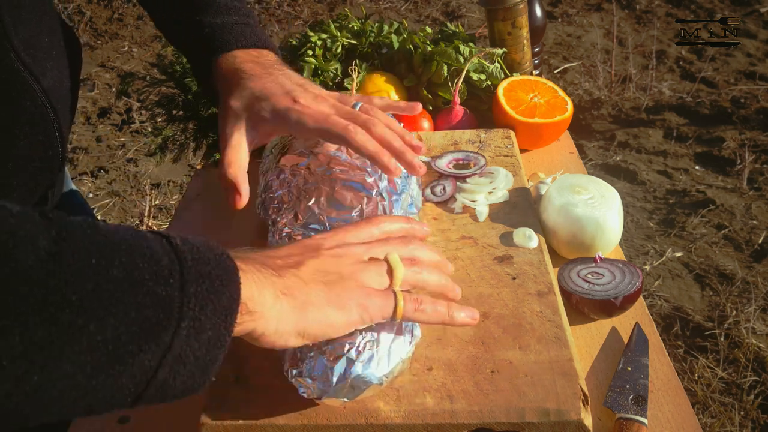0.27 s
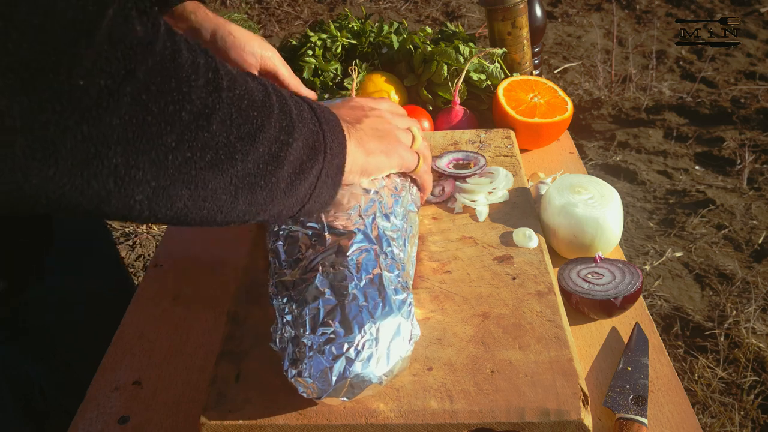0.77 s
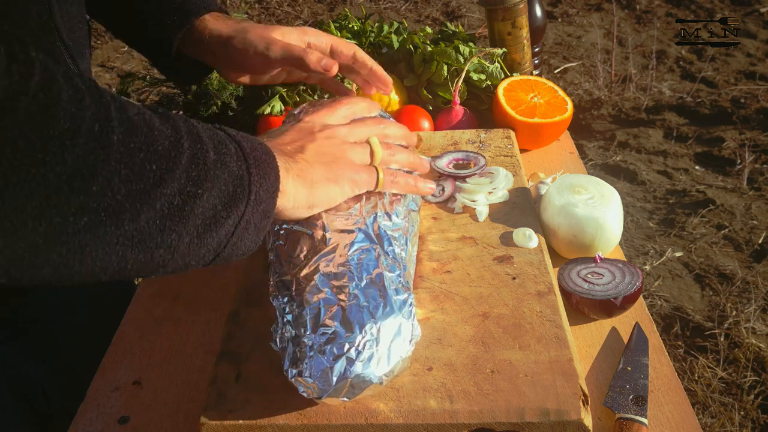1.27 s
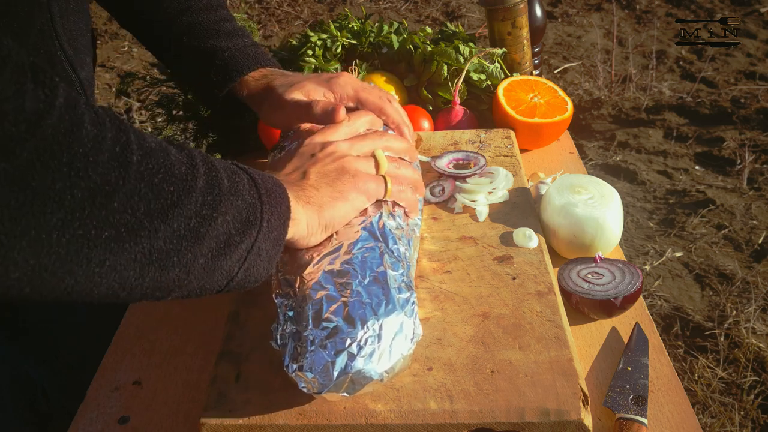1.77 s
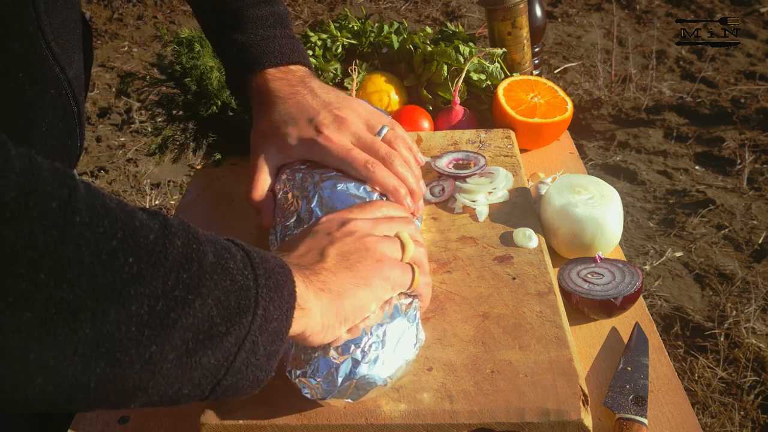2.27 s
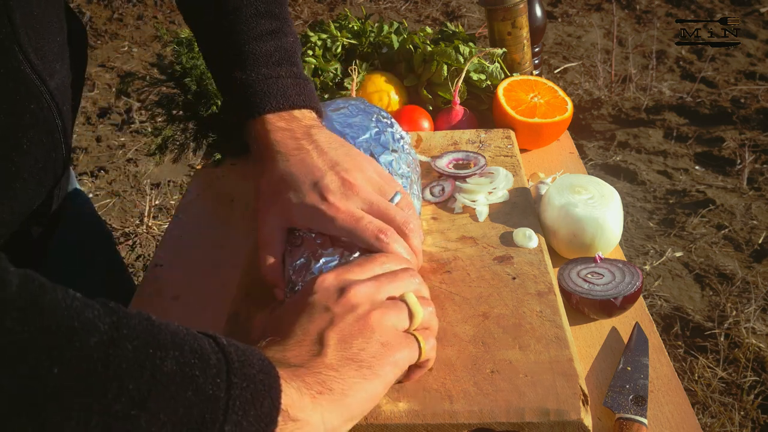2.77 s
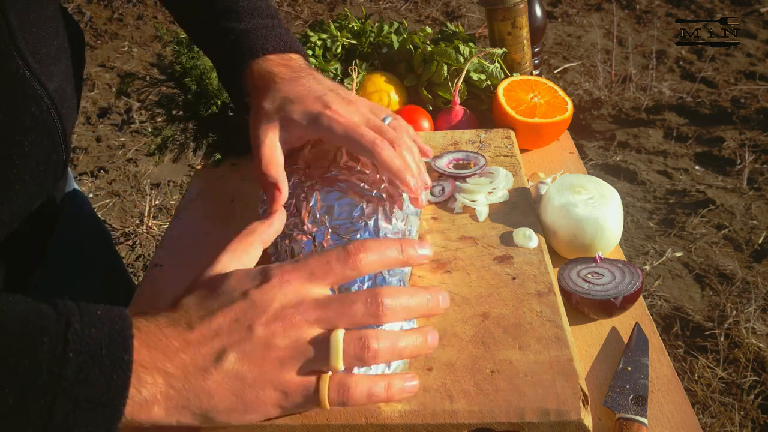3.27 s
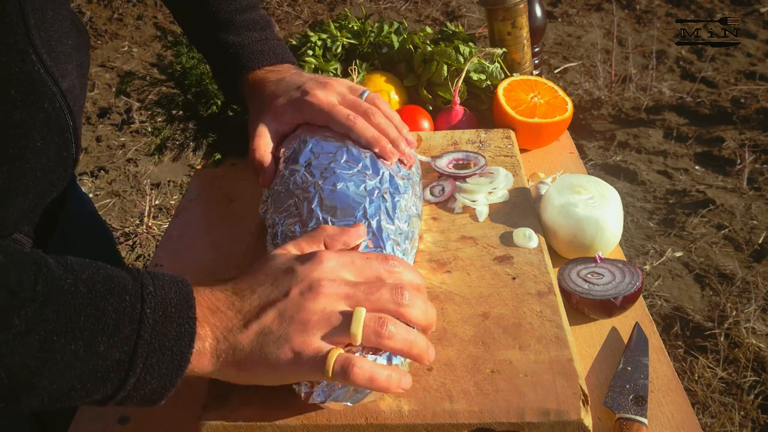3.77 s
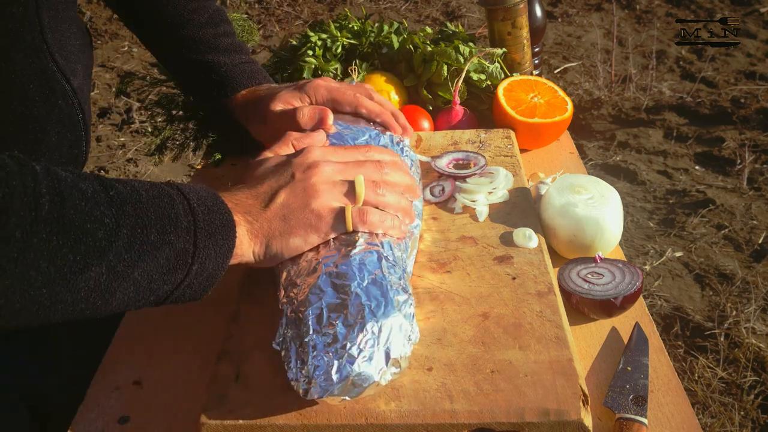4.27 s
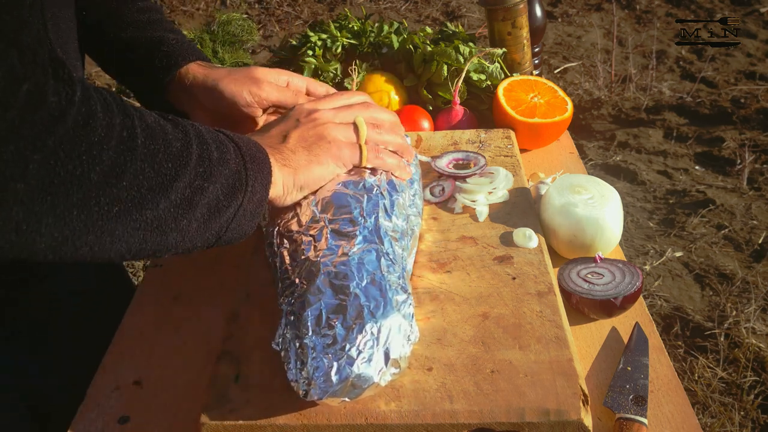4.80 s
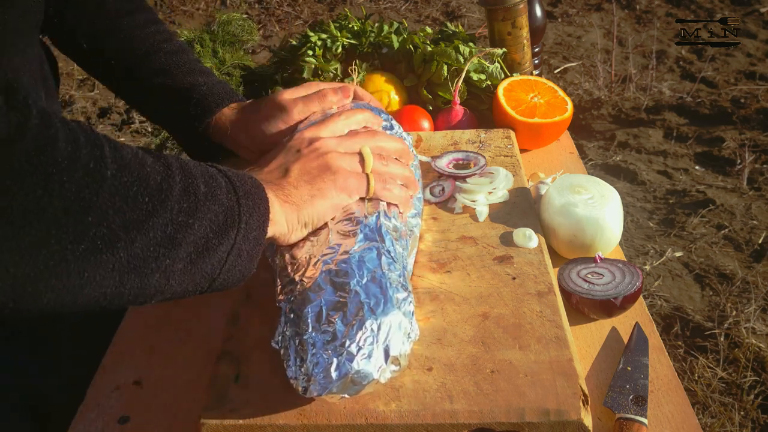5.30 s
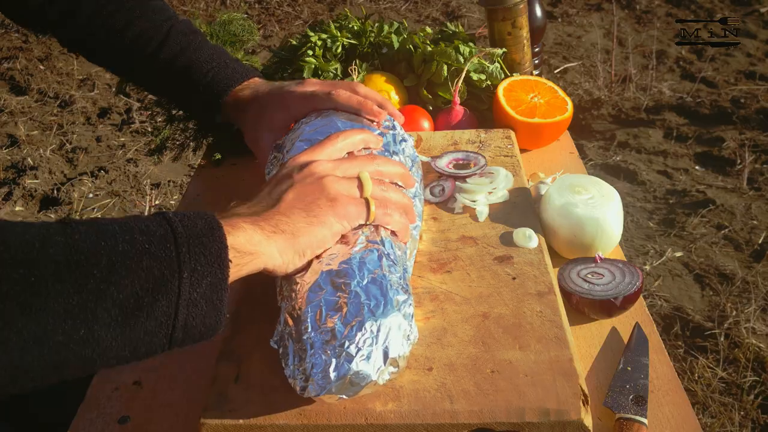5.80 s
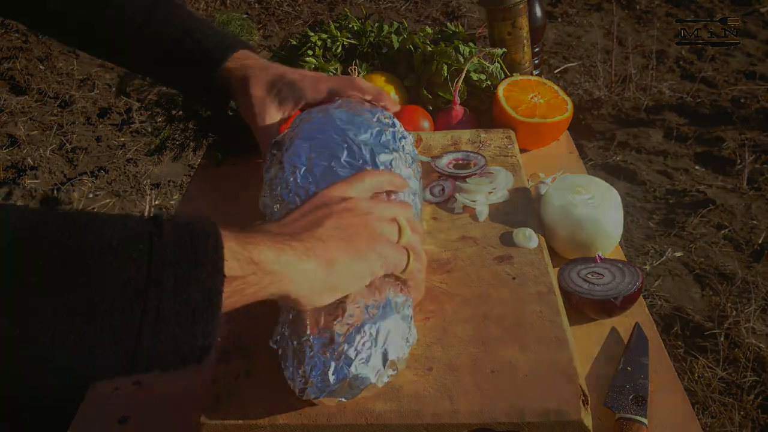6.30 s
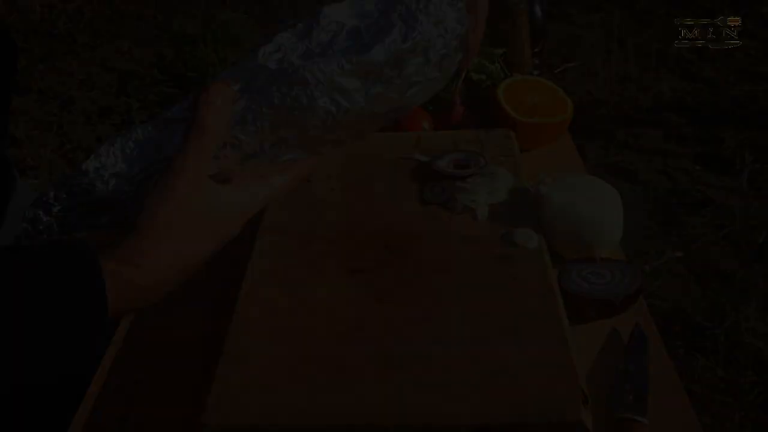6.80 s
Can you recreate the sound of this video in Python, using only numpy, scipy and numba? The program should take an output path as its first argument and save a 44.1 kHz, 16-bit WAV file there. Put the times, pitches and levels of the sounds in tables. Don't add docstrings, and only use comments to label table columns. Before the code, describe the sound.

Outdoors, a small stereo microphone sits close to hands pressing aluminium foil round a parcel. A sharp crunch opens at 0 s, followed by a lighter press and sparse ticks until about 0.6 s. Dense crackling with hard snaps fills 0.65 to 1.05 s, then another strong squeeze runs from 1.35 to 1.7 s. More crumpling comes at 2.1 to 2.35 s, and a heavy burst from 2.65 to 3.0 s holds the loudest snap near 2.93 s. Shorter squeezes follow around 3.5, 4.1, 4.7, 5.2 and 5.9 s, separated by quiet gaps with dry single ticks as the sheet springs back. Low wind rumble comes and goes beneath, its strongest gust near 5.2 s, over very faint hiss. From 6.45 s the last crackles fade, reaching silence by about 6.94 s.

```python
import sys
import numpy as np
from scipy import signal
from scipy.fft import rfft, irfft
from scipy.io import wavfile
from scipy.ndimage import uniform_filter1d
from numba import njit

SR = 44100
rng = np.random.default_rng(int(sys.argv[2]) if len(sys.argv) > 2 else 0)


def volts(x):
    e = np.asarray(x, float) / 20
    return 10 ** e


def store_pcm(level_fs):
    pcm = np.round(np.clip(level_fs, -1, 1) * 32767).astype(np.int16)
    wavfile.write(sys.argv[1], SR, np.atleast_2d(pcm).T)


N = 310905
TIME = np.arange(N) / SR
FADE_FROM_S, FADE_TO_S = 6.45, 6.937
FADE = np.interp(TIME, [FADE_FROM_S, FADE_TO_S], [1, 0])
TREBLE_DB = -4.0

# frequency in Hz, gain in dB.
LEFT_PORT = [(400, -17), (600, -27), (850, -5.5), (1400, -3), (2200, -3), (2900, 2.44), (4000, -3.5),
             (5500, -1), (7800, 1), (8600, -1.5), (9600, -17.5), (11400, -25.5), (12200, -19.5),
             (15700, -20)]
# frequency in Hz, gain in dB.
RIGHT_PORT = [(400, -9), (600, -20), (850, -13), (1400, -7), (2200, 4), (2900, -0.66), (4000, -1.5),
              (5500, -3.5), (7800, -13), (8600, -16.5), (9600, -27), (11400, -30.5), (12200, -27),
              (15700, -26)]


def pressure(s):
    # grip in seconds, letting go in seconds,
    # crackle level at the grip in dB, level at letting go in dB.
    squeezes = [(0.0, 0.043, -41.5, -43.5), (0.2, 0.365, -48.5, -60), (0.644, 0.792, -53.5, -47),
                (0.826, 1.002, -42, -43), (1.01, 1.053, -58, -55), (1.124, 1.185, -54.5, -47),
                (1.342, 1.442, -49, -46), (1.432, 1.698, -41.5, -46), (1.865, 1.98, -51.5, -62),
                (2.083, 2.351, -44.5, -41.5), (2.499, 2.626, -47.5, -63), (2.64, 2.873, -50, -44),
                (2.845, 3.002, -44.5, -48.5), (3.165, 3.223, -54.5, -45), (3.398, 3.483, -61, -51),
                (3.487, 3.686, -42.5, -49), (3.819, 3.916, -47.5, -52.5), (4.019, 4.219, -43.5, -45),
                (4.318, 4.431, -64, -50), (4.59, 4.771, -49, -46.5), (4.908, 4.995, -54, -49.5),
                (5.048, 5.293, -44.5, -47.5), (5.428, 5.503, -57.5, -48), (5.593, 5.626, -47, -48.5),
                (5.654, 5.854, -54, -45), (5.87, 5.961, -46, -51), (6.048, 6.236, -54, -58),
                (6.27, 6.372, -55, -52), (6.421, 6.636, -53.5, -44), (6.745, 6.8, -70, -69.5)]
    grip_db_per_s, release_db_per_s = 520, 611
    touch_db, touch_db_per_s = -11, 110
    settle_db, settle_db_per_s, rest_db = -17, 102, -71.5
    grip, free, grip_db, free_db = np.transpose(squeezes)[:, :, None]
    held_db = grip_db + (free_db - grip_db) * np.clip((s - grip) / (free - grip), 0, 1)
    fade_db = 20 * np.log10(np.interp(s, TIME, FADE) + 0.01)
    before = np.maximum(grip - s, 0)
    rise_db = np.minimum(grip_db_per_s * before, touch_db_per_s * before - touch_db)
    after = np.maximum(s - free, 0)
    fall_db = np.minimum(release_db_per_s * after, settle_db_per_s * after - settle_db - fade_db)
    db = held_db - rise_db - fall_db
    return np.maximum(db.max(axis=0), rest_db + fade_db)


def crackle(count=8500, burst_db=2.5, loose_db=3.0, tight_db=2.0, trim_db=2.13):
    treble_wander_db, loose_dull_db = 1.18, -1.5
    loose_share = 0.4
    when, odds, pick = rng.random((count, 3)).T
    when = (np.arange(count) + 2 * when) * N / SR / (count + 1)
    at = (when * SR).astype(int)
    db = pressure(when)
    treble_db = TREBLE_DB + treble_wander_db * walk(12)[at]
    treble_db = treble_db + np.interp(db, [-72, -58], [loose_dull_db, 0])
    bursts_db = burst_db * (walk(160) + 0.75 * walk(35))[at]
    scatter_db = np.interp(db, [-65, -45], [loose_db, tight_db])
    size_db = -scatter_db * (-0.5 + np.log(odds + 0.022))
    energy = volts(db + trim_db + bursts_db + size_db) ** 2 * N / count
    share = np.interp(db, [-68, -48], [loose_share, 1])
    energy = energy * (pick < share) / share
    hz, energy = flurry(when, energy, 0.72 * (treble_db + 4.0), count=7)
    return facets(when[:, None], energy, hz, spread_ms=1.6, cycles=1.09, length_spread=0.66)


def snaps(table, flurry_db=14.5, ring_db=1.5, ring_cycles=0.49):
    s, db, pitch_hz, treble_db = np.transpose(table)
    hz, energy = flurry(s, volts(db + flurry_db) ** 2, 0.55 * (treble_db + 4), count=24)
    broad = facets(s[:, None] - 0.001, energy, hz, spread_ms=1.05, cycles=0.57, length_spread=0.32)
    peak = volts(db + ring_db) / np.sqrt(gain(LEFT_PORT, pitch_hz) * gain(RIGHT_PORT, pitch_hz))
    energy = peak ** 2 * ring_cycles * SR / np.minimum(pitch_hz, 3000)
    ring = facets(s - 0.0006, energy, pitch_hz, spread_ms=0.03, cycles=ring_cycles, length_spread=0.054)
    return broad + ring


def creases(over_db=10.5, scatter_db=2.0, treble_spread_db=8.0, count=170):
    when, odds, place, tone = rng.random((count, 4)).T
    s = (np.arange(count) + when) * FADE_TO_S / count
    db = pressure(s) + over_db - scatter_db * np.log(odds + 0.05)
    treble_db = TREBLE_DB + treble_spread_db * 2 * (tone - 0.5)
    return np.transpose([s, db, 1800 * 4.5 ** place, treble_db])


def crumpled_foil():
    # peak time in seconds, peak level in dB,
    # pitch of the largest facet in Hz, treble share in dB.
    clear_creases = [(0.002, -25, 3440, -6), (0.0684, -28, 3300, 4), (0.2078, -38, 6350, -24),
                     (0.6727, -32.5, 2300, -5), (0.8613, -28, 2340, -9), (0.8905, -26, 2840, -14),
                     (0.9326, -29.5, 8400, -10), (0.9581, -24, 2270, -11), (1.0015, -25.5, 2580, -4),
                     (1.3724, -33.5, 7100, 4), (1.5812, -27.5, 2560, -18), (1.6822, -30.5, 1380, -10),
                     (2.1785, -27, 2560, -13), (2.2162, -28.5, 1930, -7), (2.2451, -29, 3000, 7),
                     (2.3576, -32, 3000, -7), (2.8248, -22, 2600, -5), (2.8632, -25.5, 2170, -6),
                     (2.9303, -17, 2110, -18.5), (3.1765, -36.5, 1820, -23), (3.5766, -26.5, 2300, 4),
                     (3.6465, -30, 2410, -5), (4.0316, -33, 2640, -7), (4.1793, -32.5, 3140, -8),
                     (4.2224, -33, 3120, 2), (4.7612, -26, 7200, 6), (5.2052, -33.5, 2360, 1),
                     (5.3049, -27.5, 3030, 7), (5.8774, -24.5, 2790, -3), (6.4905, -35, 1590, -8)]
    # time in seconds, peak level in dB,
    # pitch in Hz, treble share in dB.
    lone_ticks = [(0.0851, -44, 4480, -1), (0.3505, -38.5, 2800, -12), (0.359, -39, 2890, -11),
                  (0.4597, -48.5, 5810, -7), (0.4996, -53, 2580, -4.6), (0.5405, -53.2, 7900, -1.5),
                  (1.0809, -41, 5080, 2), (1.1292, -32.5, 8200, 7.5), (1.2668, -37.5, 2520, -2),
                  (1.3127, -44, 7490, -1), (1.7538, -36, 3060, -1), (1.8777, -37, 7660, 15),
                  (1.963, -34.5, 5000, 2), (2.436, -43, 5770, 4), (3.0284, -42.5, 6500, -9),
                  (3.159, -38.5, 4310, -14), (3.343, -50, 1730, -14), (3.371, -53, 5300, 18),
                  (3.7284, -37.5, 5370, 2), (3.748, -45, 4390, 0), (3.7722, -41, 4390, -3),
                  (4.2636, -41.5, 5640, -3), (4.33, -41.5, 4800, 9), (4.455, -35.5, 6600, -2),
                  (4.8122, -33.5, 3080, -1), (5.3459, -34, 8000, 3), (5.5003, -35, 7400, -1.9),
                  (5.9752, -37, 2930, 2), (6.4174, -42.5, 5560, -5), (6.871, -60.5, 4500, 2)]
    foil = crackle() + snaps(np.vstack([clear_creases, creases()]))
    foil = foil + snaps(lone_ticks, flurry_db=15.5, ring_db=0.1, ring_cycles=0.56)
    return np.array([colour(foil[0], LEFT_PORT), colour(foil[1], RIGHT_PORT)])


def flurry(s, energy, tilt_db, count, patchy_db=2.0):
    low, high = np.sqrt(500), np.sqrt(16500)
    place, patch = np.moveaxis(rng.random((len(s), count, 2)), -1, 0)
    hz = (low + (high - low) * (np.arange(count) + place) / count) ** 2
    tilt = volts(tilt_db[:, None] * np.log2(np.clip(hz, 2100, 8000) / 3500))
    patchiness = volts(2 * patchy_db * (patch - 0.5))
    share = np.sqrt(hz / 4000) * (tilt * patchiness) ** 2
    return hz, energy[:, None] * share / share.sum(axis=1, keepdims=True)


def facets(s, energy, hz, spread_ms, cycles, length_spread, alike_hz=2300, scatter=1.8, lead_us=60, pan_db=4.5):
    wait, length, turn, slip, pan = np.moveaxis(rng.standard_normal(hz.shape + (5,)), -1, 0)
    start = (SR * (s + spread_ms / 1000 * wait ** 2)).astype(np.int64).ravel()
    tau = cycles * (hz / 2000) ** 0.18 * np.exp(length_spread * length) * SR / hz
    tau = np.clip(tau, 2, 70)
    size = np.sqrt(8 * energy / tau)
    unlike = 1 / (1 + (alike_hz / hz) ** 6)
    apart = unlike * (2 * np.pi * hz * lead_us / 960000.0 + scatter * slip)
    ports = []
    for side in (0.5, -0.5):
        loud = size * volts(side * pan_db * pan * (0.6752 + unlike))
        phase = 10 * turn + side * apart
        ports.append(rings(start, hz.ravel(), tau.ravel(), loud.ravel(), phase.ravel()))
    return np.array(ports)


@njit
def rings(start, hz, tau, size, phase):
    out = np.zeros(N)
    for g in range(len(start)):
        step = np.exp(2j * np.pi * hz[g] / SR - 1 / tau[g])
        z = size[g] / tau[g] * np.exp(1j * phase[g])
        for i in range(int(7 * tau[g]) + 2):
            if 0 <= start[g] + i < N:
                out[start[g] + i] += i * z.imag
            z *= step
    return out


def wind(apart_db=-18.5):
    # frequency in Hz, level in dB per Hz.
    rumble = [(15, -9), (30, -0.5), (64, -1), (130, -7), (220, -14.5), (400, -32), (700, -40),
              (1200, -57.5)]
    # peak time in seconds, rumble level in dB.
    gusts = [(0.05, -52), (0.79, -55.5), (0.9, -57), (1.19, -59.5), (1.42, -54), (1.53, -50.5), (1.68, -55),
             (1.9, -55.5), (2.1, -59.5), (2.3, -51.5), (2.75, -60), (2.9, -57), (3.55, -59), (3.68, -53.5),
             (3.91, -57.5), (4.19, -52.5), (4.62, -57.5), (4.35, -57), (4.78, -56), (4.95, -57.5),
             (5.211, -45.5), (5.78, -53.5), (5.891, -49), (6.23, -58)]
    breeze_db, rise_db_per_s, fall_db_per_s = -64.0, 111, 138
    mid, side = (colour(rng.standard_normal(N), rumble, size=16384) for _ in range(2))
    side = signal.lfilter(*signal.butter(1, 160, "high", fs=SR), side) * volts(apart_db + 7.5)
    gust_db = breeze_db + 1.9 * walk(4)
    for s, db in gusts:
        away_db = np.maximum(rise_db_per_s * (s - TIME), fall_db_per_s * (TIME - s))
        gust_db = np.maximum(gust_db, db - away_db)
    scale = FADE ** 1.53 * volts(gust_db + 2.1 * walk(12)) / np.std(mid)
    return scale * np.array([mid + side, mid - side])


def hiss():
    # frequency in Hz, level in dB per Hz.
    hiss_spectrum = [(60, 6), (120, 4), (250, 10.5), (450, 0), (700, -3.5), (2000, -3.5), (4000, -8),
                     (8000, -20.5), (9700, -15), (16000, -18.5)]
    noise = np.array([level(colour(rng.standard_normal(N), hiss_spectrum), -70.5) for _ in range(2)])
    return noise - volts(-67.5)


def gain(table, hz):
    points, db = np.transpose(table)
    return volts(np.interp(np.log(hz + 1), np.log(points), db))


def colour(x, table, size=2048):
    cepstrum = irfft(np.log(gain(table, np.arange(size // 2 + 1) * SR / size)))
    cepstrum[1:size // 2] *= 2
    cepstrum[size // 2 + 1:] = 0
    response = irfft(np.exp(rfft(cepstrum)))
    return signal.fftconvolve(x, response)[:N]


def level(x, db):
    return x * volts(db) / np.sqrt(np.mean(x ** 2))


def walk(rate):
    k = int(SR / rate)
    held = np.repeat(rng.standard_normal(N // k + 1), k)[:N]
    return 0.99 * uniform_filter1d(uniform_filter1d(held, k), k)


def scene():
    return (crumpled_foil() + wind()) * (TIME < FADE_TO_S) + FADE * hiss()


def top_cut(x):
    return signal.sosfilt(signal.butter(12, 16560, fs=SR, output="sos"), x)


def record(dry):
    low_pass = signal.ellip(10, 0.3, 60, 15850, fs=SR, output="sos")
    mix = signal.sosfilt(low_pass, dry)
    return top_cut(mix)


dry = scene()
out = record(dry)
store_pcm(out)
```